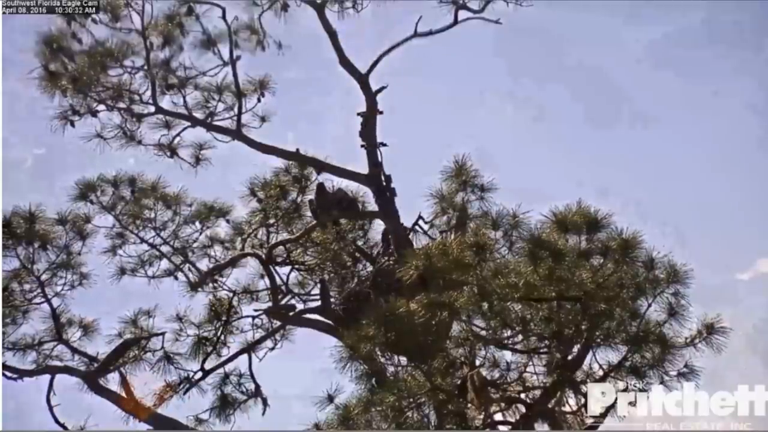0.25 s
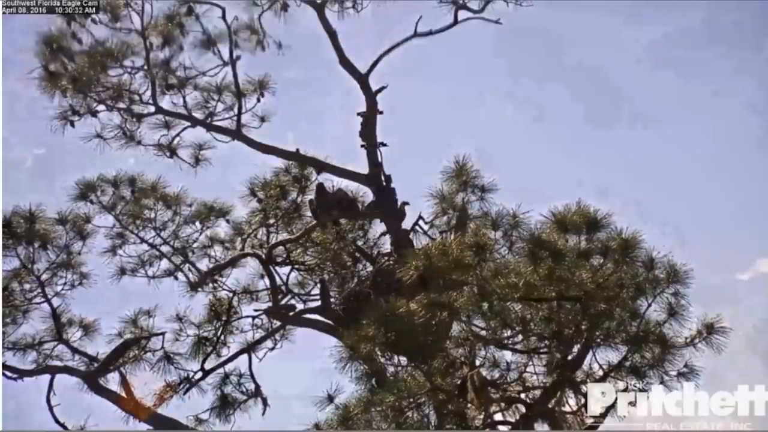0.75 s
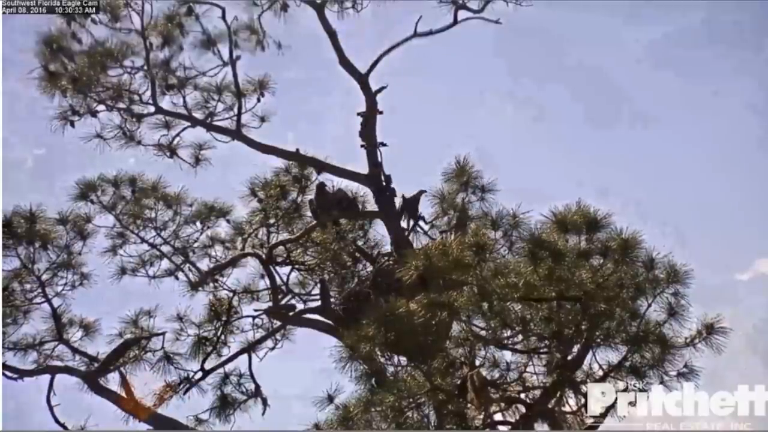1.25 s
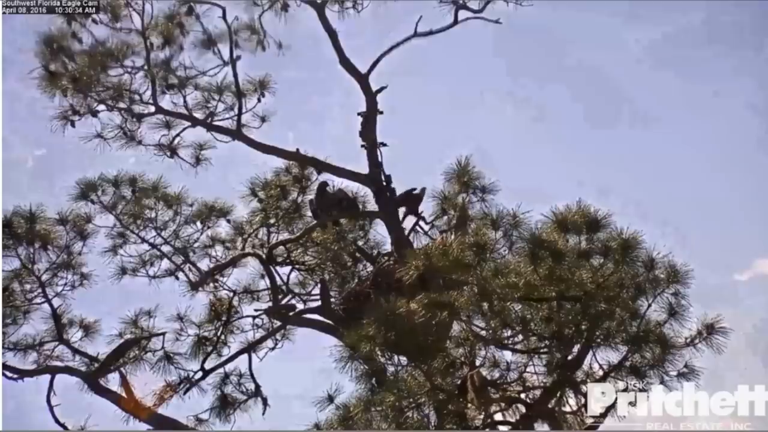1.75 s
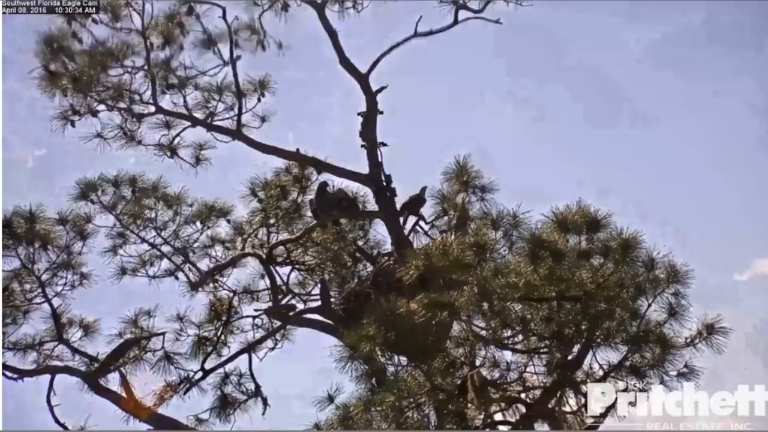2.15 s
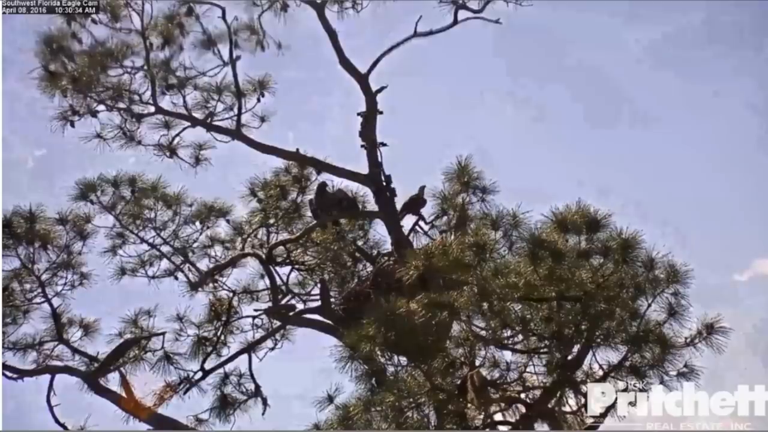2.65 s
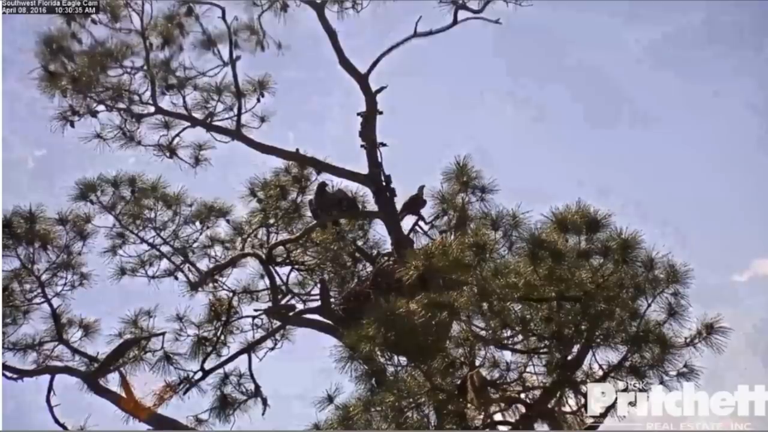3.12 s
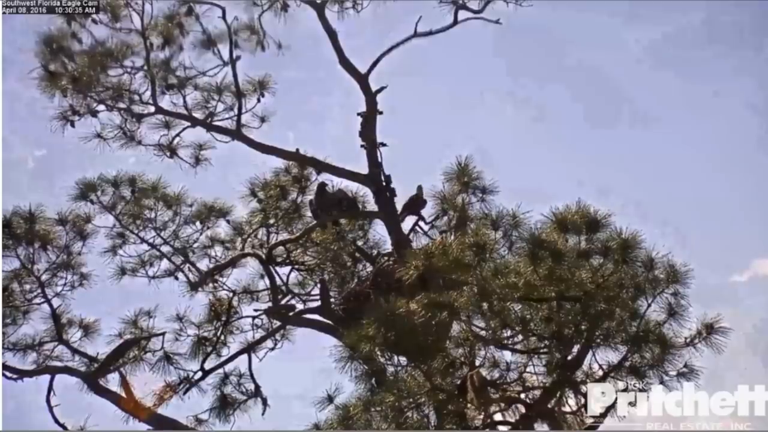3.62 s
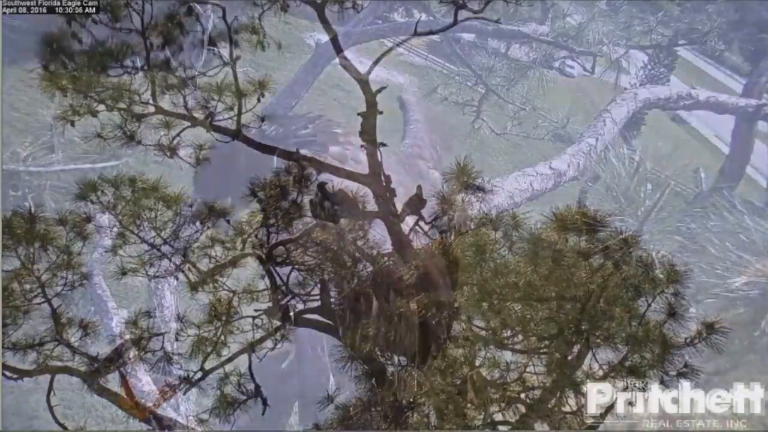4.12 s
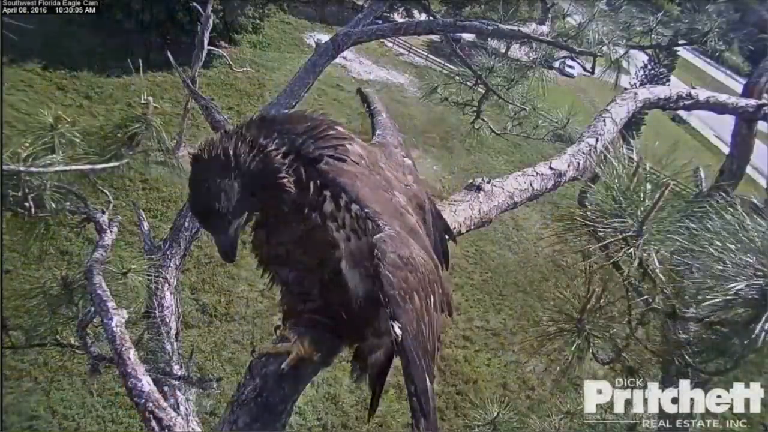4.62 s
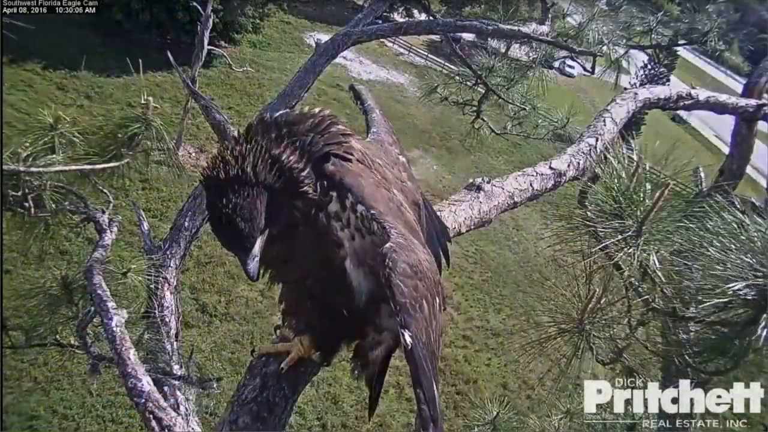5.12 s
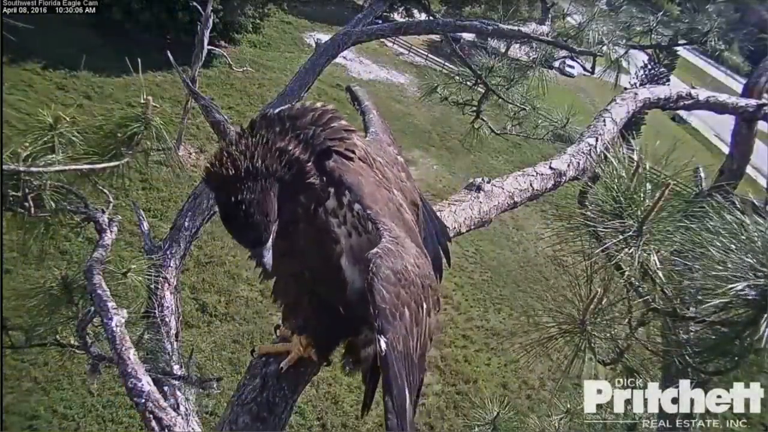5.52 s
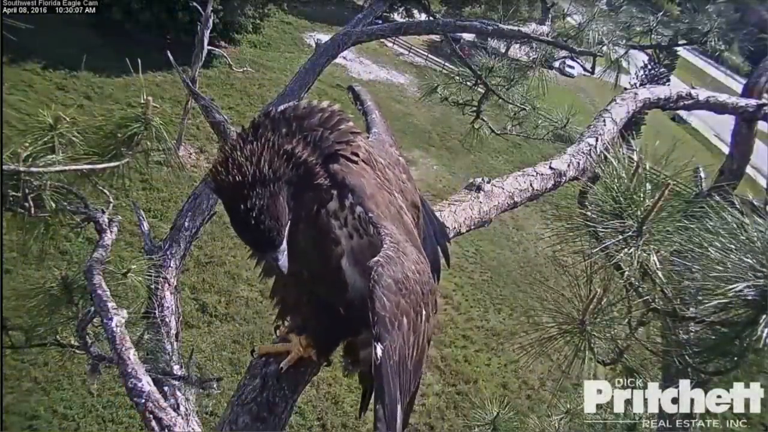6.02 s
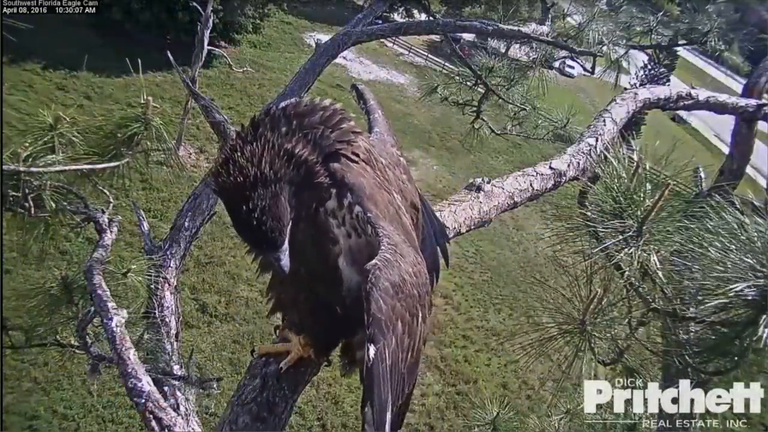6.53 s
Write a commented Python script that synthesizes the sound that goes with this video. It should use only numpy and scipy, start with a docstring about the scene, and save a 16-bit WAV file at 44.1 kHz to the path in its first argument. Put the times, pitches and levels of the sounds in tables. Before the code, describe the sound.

Outdoors, over a soft, even hiss of open air, a young eagle calls again and again in shrill, rising whistles, each up to about a second long. Most drop sharply at the very end. Short pauses separate the early calls; then the voice climbs higher and turns into a strained, rough screech with thin squeaks between. The bird stands out clearly, with almost no echo. The sound drops out briefly twice.

```python
"""Long, high whistles climb, turn hoarse and end in a quick downward flick: a young eagle begs from a pine.
The two sides of its voice box sing at once and beat; nonlinear mixing adds an octave, side tones
and a faint low difference tone. The branches scatter the calls, and a hoarse hiss rides on the later ones.
Steady outdoor hiss lies behind the bird, and twice all sound drops out for an instant."""
import sys
import numpy as np
from scipy import signal
from scipy.fft import rfft, irfft, next_fast_len
from scipy.io import wavfile
from scipy.ndimage import uniform_filter1d, map_coordinates

SR = 44100
rng = np.random.default_rng(int(sys.argv[2]) if len(sys.argv) > 2 else 0)


def generate_wav(sig):
    """Save sig (samples, or channels by samples) to the path in sys.argv[1] as 16-bit PCM at SR."""
    pcm = np.round(np.clip(np.atleast_2d(sig).T, -1, 1) * 32767).astype(np.int16)
    wavfile.write(sys.argv[1], SR, pcm)


N = 298557
TIME = np.arange(N) / SR
STRAIN_HZ = 4790  # near the top of the bird's range

# Colouring of the octave, low difference tone and scratch. Each row: frequency in Hz, gain in dB.
OVERTONE_RESPONSE = [(40, 1), (110, -22.5), (300, -7), (600, 2), (1500, 2.5), (3700, -5.5), (4400, -15),
                     (5600, 2), (6800, 0), (7600, -19.5)]
def eaglet(gain_db=2.5, ceiling_db=-37.5, full_mix_db=-9.5, side_top_hz=4350):
    """Nonlinear mixing: two whistles are heard with their octaves and combination tones."""
    stall, force = stalls(), forcing()
    lead, lead_phasor, lead_leap = whistle(
        leading_notes(), stall, jitter=.0024, hoarse_share=.72, forced_rough=.06,
        flutter_rate=360, sag_hz=65, screech_rate=1200, screech=5.5, tremble_depth=.6)
    second, second_phasor, second_leap = whistle(
        second_notes(), stall, jitter=.006, hoarse_share=.5, forced_rough=.6,
        flutter_rate=500, sag_hz=40, screech_rate=900, screech=2, tremble_depth=.75)
    mirrored = amp(8.5) * force * lead_phasor ** 2 * second.conj()  # at 2 f1 - f2
    stepped = amp(-17.5) * second * second_phasor * lead_phasor.conj()  # at 2 f2 - f1
    # Loud notes and the crests of the beat flatten against the same ceiling.
    limit = (1 + (np.abs(lead + second + mirrored) / amp(ceiling_db)) ** 8) ** (-1 / 8)
    lead, second, mirrored, stepped = limit * np.array([lead, second, mirrored, stepped])
    side_tones = filtered((mirrored + stepped).real, lambda hz: 1 / (1 + (hz / side_top_hz) ** 24))
    both = lead + second
    power = np.abs(both) ** 2
    rms = np.sqrt(np.abs(uniform_filter1d(power, size=441)) + 1e-12)
    difference_tone = amp(-7) * force * (power / rms - rms) * (1 + .49 * wobble(330, N))
    # A leaping tone scratches over a broad band and its octave weakens.
    leaping = np.abs(lead) * lead_leap + np.abs(second) * second_leap
    scratch = amp(-5) * force * leaping * rng.standard_normal(N)
    lead_held, second_held = lead * amp(-2 * lead_leap), second * amp(-2 * second_leap)
    sum_tone = 2 * np.minimum(force / amp(full_mix_db), 1) * lead_held * second_held
    fuzz = .12 * complex_wobble(1100, N)
    octave = force * ((lead_held ** 2 + sum_tone + second_held ** 2) * (1 + fuzz)).real / rms
    overtones = coloured(octave + difference_tone + scratch, OVERTONE_RESPONSE)
    return amp(gain_db) * (both.real + side_tones + sizzle(lead, lead_phasor) + overtones)


def whistle(notes, stall, jitter, hoarse_share, forced_rough, flutter_rate, sag_hz,
            screech_rate, screech, tremble_depth, tremble_hz=34, stall_sag_hz=480.6):
    """Membrane oscillation in one side of the voice box: complex tone, unit phasor and leap (0-1)."""
    tone, phasor, leap = np.zeros(N, complex), np.zeros(N, complex), np.zeros(N)
    force, hoarse = forcing(), hoarse_share * hoarseness()
    for rows in notes:
        times, *columns = np.transpose(rows)
        span = np.arange(max(int(times[0] * SR), 0), min(int(times[-1] * SR), N))
        t, size = span / SR, len(span)
        hz, db = (np.interp(t, times, column) for column in columns)
        leap[span] = np.clip(np.abs(np.gradient(hz)) * SR / 33000, 0, 1) ** 2  # full at 33000 Hz/s
        strain = .056 * (hz / STRAIN_HZ) ** 4
        rough = .0037 + strain + hoarse[span] + forced_rough * force[span] + .072 * leap[span]
        # Even a clear pitch jitters and wanders; a hoarse one also quavers.
        hz *= 1 + jitter * (.4 * wobble(50, size) + wobble(160, size) + .9 * wobble(700, size))
        hz *= 1 + .0012 * wobble(42, size) + .025 * hoarse[span] * wobble(55, size)
        rotation = np.exp(2j * np.pi * np.cumsum(hz - stall_sag_hz * stall[span]) / SR)
        # Hoarseness comes in trembling bursts; forcing evens them out and widens them into a screech.
        wide = screech * force[span]
        tremble = np.sin(2 * np.pi * tremble_hz * t + 1.5 * wobble(25, size))
        rough = np.clip(rough * (1 + tremble_depth * tremble / (1 + 2 * wide ** 2)), 0, .95)
        # Uneven flapping smears part of the tone into a band just under the pitch.
        flutter = complex_wobble(flutter_rate, size) + wide * complex_wobble(screech_rate, size)
        flutter /= np.sqrt(2 + 2 * wide ** 2)
        swing = np.sqrt(1 - rough ** 2) + rough * flutter * np.exp(-2j * np.pi * sag_hz * t)
        swing = unit(swing / (1 + (np.abs(swing) / 1.45) ** 4) ** (1 / 4))  # the swing saturates
        edges = np.clip(np.minimum(t - times[0], times[-1] - t) / .004, 0, 1)
        level = amp(db + 1.5 * hoarse[span] + .2 * wobble(42, size))  # slightly louder when hoarse
        tone[span] += level * edges * (1 - stall[span]) * swing * rotation
        phasor[span] = rotation
    return tone, phasor, uniform_filter1d(leap, size=441)


# The held part of each call, one list a call. Each row: time in seconds, pitch in Hz, relative level in dB.
HELD_PITCHES = [
    [(0.0, 3100, -52.5), (0.062, 3157, -56), (0.091, 3270, -66), (0.096, 3404, -46), (0.166, 3335, -47.5),
     (0.2, 3280, -51), (0.231, 3240, -58), (0.237, 3400, -46.5), (0.282, 3503, -43), (0.348, 3405, -44),
     (0.468, 3397, -43), (0.522, 3415, -48.5), (0.53, 3440, -54.5), (0.538, 3450, -47.5),
     (0.644, 3446, -45), (0.658, 3520, -50), (0.666, 3560, -46.5), (0.69, 3556, -42.5), (0.71, 3580, -49)],
    [(0.752, 2752, -40), (0.798, 2820, -39), (0.866, 2788, -40), (1.076, 2916, -40), (1.168, 3020, -40),
     (1.186, 3304, -40.5), (1.191, 3356, -45.5), (1.206, 3438, -42), (1.21, 3450, -38),
     (1.224, 3448, -40.5), (1.24, 3374, -42), (1.283, 3240, -40.5), (1.292, 2930, -40.5)],
    [(1.864, 2766, -38.5), (1.88, 2840, -39.5), (1.985, 3005, -41.5), (2.008, 3075, -41),
     (2.022, 3067, -41), (2.036, 3223, -41.5), (2.07, 3283, -39), (2.095, 3262, -40.5),
     (2.174, 3304, -41.5), (2.272, 3412, -39.5), (2.296, 3419, -40.5), (2.308, 3360, -42),
     (2.434, 3440, -44), (2.575, 3476, -42.5), (2.592, 3440, -40.5)],
    [(3.15, 2689, -51.5), (3.176, 2824, -53), (3.196, 2802, -45), (3.236, 2872, -41), (3.302, 2832, -50),
     (3.372, 2992, -41.5), (3.52, 3030, -42), (3.606, 3254, -43), (3.698, 3277, -46), (3.73, 3300, -47.5),
     (3.756, 3240, -38), (3.772, 3674, -56.5), (3.882, 3890, -55), (3.91, 3904, -49.5), (4.008, 3976, -48)],
    [(4.155, 4030, -50), (4.19, 4130, -52), (4.246, 4176, -52), (4.288, 4150, -57), (4.338, 4400, -55.5),
     (4.364, 4420, -49), (4.414, 4210, -49.5), (4.44, 4363, -55), (4.448, 4280, -51), (4.51, 4373, -55.5),
     (4.55, 4480, -52.5), (4.604, 4466, -54), (4.688, 4430, -42), (4.738, 4504, -42), (4.79, 4410, -41.5),
     (4.85, 4350, -42), (4.93, 4495, -42), (4.975, 4396, -42), (5.035, 4436, -43), (5.125, 4443, -43),
     (5.158, 4354, -42), (5.18, 4430, -42), (5.27, 4430, -41), (5.282, 4420, -44.5)],
    [(5.8, 3966, -52.5), (5.85, 3843, -46), (5.93, 3960, -52), (5.972, 3965, -40.5), (6.212, 4030, -43.5),
     (6.278, 4010, -41.5), (6.29, 3840, -42.5), (6.304, 4030, -40.5), (6.368, 4150, -46.5),
     (6.382, 4085, -42), (6.434, 4104, -44.5), (6.6, 4100, -44.5), (6.655, 4076, -44.5), (6.703, 3935, -43),
     (6.733, 4210, -47), (6.77, 4060, -42.5)],
]
# The plunge that closes each call but the last.
# Each row: length in seconds, final pitch in Hz, relative level in dB, roughness from 0 to 1.
CLOSING_FLICKS = [(.036, 2120, -47.5, 0.55), (.037, 2380, -44.5, 0.15), (0.035, 2580, -44, 0.25),
                  (0.037, 2550, -46, 1), (.038, 2400, -39.5, 0.45)]
def leading_notes(attack_s=.012, attack_db=3.5):
    """Pitch and level contours of the leading side: attack, held whistle and, but for the last, a flick."""
    endings = [flick(*rows[-1], *plunge[:3]) for rows, plunge in zip(HELD_PITCHES, CLOSING_FLICKS)]
    endings.append(HELD_PITCHES[-1][-1:])
    notes = []
    for rows, ending in zip(HELD_PITCHES, endings):
        start, hz, db = rows[0]
        notes.append([(start - attack_s, hz, db - attack_db), *rows[:-1], *ending])
    return notes


def flick(start, hz, db, length, last_hz, late_db):
    """An accelerating downward glide. Each row: time in seconds, pitch in Hz, relative level in dB."""
    progress = np.linspace(0, 1, 10)
    level = np.interp(progress, [0, 1 / 3, 3 / 4, 1], [db, min(db, late_db) + 2, late_db, late_db - 1])
    return np.transpose([start + progress * length, hz + progress ** 1.25 * (last_hz - hz), level])


# The second side's own notes: a chip, a squeal, a low yelp, a thin squeak and an upward scoop.
# Each row: time in seconds, pitch in Hz, relative level in dB.
OWN_NOTES = [
    [(1.84, 3116, -50), (1.86, 2940, -58)],
    [(4.02, 4250, -56), (4.086, 4830, -71), (4.15, 4650, -62)],
    [(4.522, 2720, -51), (4.54, 3620, -47), (4.555, 3360, -48.5), (4.58, 3360, -48.5), (4.609, 3370, -40.5),
     (4.625, 3610, -47), (4.655, 3730, -42), (4.662, 3855, -51)],
    [(5.36, 3820, -57), (5.385, 3637, -49.5), (5.41, 4310, -63), (5.425, 4170, -59), (5.445, 4420, -60.5),
     (5.475, 4330, -64), (5.49, 4870, -63.5), (5.57, 4950, -70), (5.65, 5270, -77.5), (5.76, 5030, -63),
     (5.83, 4820, -65)],
    [(5.756, 2510, -57), (5.767, 2620, -43), (5.78, 3024, -40.5), (5.8, 3370, -40.5), (5.84, 3346, -47.5),
     (5.868, 3312, -39), (5.89, 3380, -46.5), (5.968, 3640, -47.5)],
]
# The second side sings just above or below the leading pitch.
# Each row: start and end in seconds, first and last pitch gap in Hz, relative level in dB.
SHADOW_NOTES = [(0, 0.102, 379.5, 380, -59.5), (0.205, 0.23, 249, 480.5, -60),
                (1.232, 1.259, 602.5, 706, -54), (2.032, 2.082, 581.5, 558, -57.5),
                (2.085, 2.194, 631.5, 650, -53), (2.188, 2.212, 399.5, 598, -57.5),
                (2.237, 2.254, 593, 563, -60), (2.298, 2.381, 647.5, 567, -52),
                (2.369, 2.579, 574.5, 554.5, -52), (3.18, 3.564, 399, 367, -55.5),
                (3.56, 3.747, 317.5, 234.5, -54), (3.77, 4.158, -320, -380, -57.5),
                (4.665, 4.768, -240, -270, -54), (6.178, 6.422, 562.5, 561, -74),
                (6.441, 6.613, 745, 1197, -66.5), (6.643, 6.72, 621, 621, -60)]
# The second side plunges alone in mid-call. Each row: start in seconds, relative level in dB.
VOICE_CRACKS = [(4.245, -52), (5.008, -49)]
def second_notes():
    """Biphonation: the second side sings its own notes, shadows the leading pitch or cracks away."""
    times, lead_hz, _ = np.concatenate(HELD_PITCHES).T
    notes = list(OWN_NOTES)
    arch_db = 3 * np.linspace(-1, 1, 20) ** 4  # weaker as it enters and leaves
    for start, end, first_gap, last_gap, db in SHADOW_NOTES:
        t = np.linspace(start, end, 20)
        hz = np.interp(t, times, lead_hz) + np.linspace(first_gap, last_gap, 20)
        notes.append(np.transpose([t, hz, db - arch_db]))
    for start, db in VOICE_CRACKS:
        hz = np.interp(start, times, lead_hz)
        notes.append(flick(start, hz, db - 1, length=.028, last_hz=2640, late_db=db))
    return notes


# How hard the voice is forced. Each row: time in seconds, overtone drive in dB.
VOCAL_FORCE = [(0, -33), (.72, -31.5), (.75, -14.5), (1.32, -10.5), (1.842, -26), (1.862, -13.5),
               (2.62, -10), (3.15, -33), (3.24, -26.5), (3.32, -36), (3.39, -21), (3.52, -18.5),
               (3.65, -27.5), (3.76, -22.5), (3.85, -28), (4.48, -37), (4.58, -23.5), (4.75, -23),
               (5.005, -24), (5.025, -13.5), (5.045, -24.5), (5.25, -23.5), (5.3, -12.5), (5.36, -34.5),
               (5.77, -29.5), (5.81, -10.5), (6.0, -32.5)]
def forcing():
    """Nonlinear drive as a gain: the harder the voice is forced, the stronger the overtones."""
    return amp(curve(VOCAL_FORCE))


# Spells of hoarseness. Each row: start and end in seconds, roughness from 0 to 1.
HOARSE_SPELLS = [(.19, .23, 0.55), (1.185, 1.27, 0.13), (2.03, 2.24, 0.08), (2.33, 2.38, 0.33),
                 (2.38, 2.588, 0.62), (3.14, 3.19, 0.66), (3.6, 3.88, 0.29), (4.02, 4.32, 0.9),
                 (4.32, 4.48, 0.44), (4.76, 5.28, 0.01), (5.012, 5.04, 0.22), (5.4, 5.755, 0.57),
                 (5.755, 5.8, 0.31), (5.8, 5.96, .24), (6.025, 6.13, 0.55), (6.13, 6.2, .3),
                 (6.2, 6.33, 0.6), (6.33, 6.45, 0.34), (6.45, 6.688, 0.6)]
def hoarseness():
    """Aperiodic vibration (0-1): the voice roughens in the hoarse spells and at every closing flick."""
    flicks = [(rows[-1][0], rows[-1][0] + length, rough)
              for rows, (length, _, _, rough) in zip(HELD_PITCHES, CLOSING_FLICKS)]
    return np.clip(spells(HOARSE_SPELLS + flicks, ramp_s=.03), 0, 1)


def stalls(half_width_s=.0011):
    """Intermittent oscillation: how far brief, uneven catches choke the hoarse voice (0-1)."""
    catches_per_s = 46 + 250 * forcing()
    gaps, sizes = rng.uniform([.25, .5], [1.75, 1.5], (1500, 2)).T
    onsets = np.searchsorted(np.cumsum(catches_per_s) / SR, np.cumsum(gaps))
    pulse = np.exp(-(np.arange(-441, 442) / SR / half_width_s) ** 2)
    catches = signal.fftconvolve(np.bincount(onsets, sizes, N + 1)[:N], pulse, "same")
    return np.clip(1.05 * hoarseness() * catches, 0, .95)


# The noisy top of a strained note. Each row: frequency in Hz, relative spectral density in dB.
SIZZLE_SPECTRUM = [(5700, -39), (6600, 11.5), (7300, 0), (7800, -20)]
def sizzle(tone, phasor):
    """Amplitude-modulated noise: a sizzle follows the tone's level and grows steeply with its pitch."""
    phase_step = np.angle(uniform_filter1d(phasor * np.roll(phasor, 1).conj(), size=400))
    pitch_hz = phase_step * SR / (2 * np.pi)
    strain = np.clip(pitch_hz / STRAIN_HZ, 0, 1) ** 6
    return amp(-31) * np.abs(tone) * strain * noise(SIZZLE_SPECTRUM) * amp(2.5 * wobble(30, N))


# The hoarse hiss and the airy hiss. Each row: frequency in Hz, relative spectral density in dB.
RASP_SPECTRUM = [(300, -29), (900, -9), (1600, 0.5), (2300, 6.5), (2850, 13.5), (3500, 5), (4800, -8.5),
                 (5600, -47), (7700, -41.5)]
AIRY_SPECTRUM = [(3700, -20), (4250, 7), (4700, -1.5), (5100, 0), (5600, -24), (6500, -50)]
# The course of the hoarse hiss. Each row: time in seconds, level in dB.
RASP_ENVELOPE = [(3.3, -100), (3.9, -68.5), (4.4, -62.5), (4.85, -55), (5.3, -57), (5.36, -62),
                 (5.74, -61.5), (5.8, -63.5), (6.77, -61)]
# Spells of airy hiss. Each row: start and end in seconds, level in dB.
AIRY_SPELLS = [(0.752, 1.37, -73), (3.151, 3.3, -82), (4.817, 5.348, -59.5), (5.422, 5.76, -96)]
def rasp():
    """Band noise: a hoarse hiss rides on the later calls, and an airy 4-5 kHz hiss comes in spells."""
    airy = noise_spells(AIRY_SPELLS, AIRY_SPECTRUM)
    hiss = amp(curve(RASP_ENVELOPE) + .72 * wobble(25, N)) * noise(RASP_SPECTRUM)
    return hiss + airy * amp(2.6 * wobble(60, N))


def thump(at_s=5.312, half_width_s=.012, level_db=-63, top_hz=284):
    """A transient of low-pass noise: a soft thump as the longest call snaps shut."""
    swell = np.exp(-((TIME - at_s) / half_width_s) ** 2)
    return amp(level_db) * swell * noise([(top_hz, 0), (2 * top_hz, -30)])


def branches(x, level_db=-16, t60_s=.17):
    """Scattering: the branches around the nest return a faint, exponentially decaying tail."""
    t = np.arange(SR // 4) / SR
    tail = rng.standard_normal(len(t)) * amp(-60 * t / t60_s)
    return amp(level_db) * signal.fftconvolve(x, tail / np.linalg.norm(tail))[:N]


# The outdoor hiss and its added treble. Each row: frequency in Hz, relative spectral density in dB.
OUTDOOR_SPECTRUM = [(25, -14.5), (100, -17), (240, -10), (620, -5.5), (1090, -3), (1420, 3.5), (2000, -1.5),
                    (2850, 3.5), (3600, -6), (4500, -39.5), (6000, -44.5), (7800, -58)]
TREBLE_SPECTRUM = [(2800, -10.5), (3800, 9), (4700, -3), (5400, -8.5), (6300, -19), (7500, -34)]
# The course of the outdoor hiss. Each row: time in seconds, level in dB.
OUTDOOR_ENVELOPE = [(0, -58.5), (.7, -60.5), (.8, -64), (1.8, -59.5), (2.65, -67.5), (2.72, -59),
                    (4.2, -63), (6.77, -63)]
# Brighter hiss in two pauses between calls. Each row: start and end in seconds, level in dB.
TREBLE_SPELLS = [(1.339, 1.83, -76.5), (2.701, 3.116, -76)]
def outdoors(hum_hz=133, hum_db=-90):
    """Ambient noise: the broadband hiss of open air wavers slightly over a faint hum."""
    hum = amp(hum_db) * np.sin(2 * np.pi * hum_hz * TIME + wobble(38, N))
    treble = noise_spells(TREBLE_SPELLS, TREBLE_SPECTRUM)
    hiss = amp(curve(OUTDOOR_ENVELOPE) + wobble(14, N)) * noise(OUTDOOR_SPECTRUM)
    return hiss + treble + hum


def amp(db):
    """Decibels to gain."""
    return 10 ** (np.asarray(db) / 20)


def unit(x):
    """Normalisation to rms 1."""
    return x / np.sqrt(np.mean(np.abs(x) ** 2) + 1e-20)


def curve(rows):
    """Linear interpolation of (seconds, value) rows at every sample."""
    return np.interp(TIME, *np.transpose(rows))


def spells(rows, ramp_s):
    """A sum of trapezoidal envelopes. Each row: start and end in seconds, height."""
    return sum(height * np.clip(.5 + np.minimum(TIME - start, end - TIME) / ramp_s, 0, 1)
               for start, end, height in rows)


def wobble(rate, size):
    """Smooth random modulation with rate knots a second."""
    knots = rng.standard_normal(int(size * rate / SR) + 4)
    return map_coordinates(knots, [np.arange(size) * rate / SR])


def complex_wobble(rate, size):
    """Random modulation of both amplitude and phase."""
    return wobble(rate, size) + 1j * wobble(rate, size)


def filtered(x, response):
    """Linear filtering: the spectrum of x times a frequency response."""
    size = next_fast_len(N + SR // 2)
    return irfft(rfft(x, size) * response(np.fft.rfftfreq(size, 1 / SR)), size)[:N]


def coloured(x, spectrum):
    """Spectral shaping by (Hz, dB) points on a logarithmic frequency axis."""
    points_hz, db = np.transpose(spectrum)
    return filtered(x, lambda hz: amp(np.interp(np.log(hz + 1), np.log(points_hz), db)))


def noise(spectrum):
    """Coloured noise of rms 1."""
    return unit(coloured(rng.standard_normal(N), spectrum))


def noise_spells(rows, spectrum):
    """Gated noise with gradual edges. Each row: start and end in seconds, level in dB."""
    return spells([(start, end, amp(db)) for start, end, db in rows], ramp_s=.042) * noise(spectrum)


def scene():
    """Superposition of the bird, its scattered sound and the open air, in mono."""
    bird = eaglet()
    return (bird + branches(bird) + rasp() + thump() + outdoors())[None]


# Brief silences. Each row: start and end in seconds.
SILENCES = [(3.1, 3.143), (6.605, 6.648)]
def record(dry, fade_in_s=.012, top_hz=7800):
    """Gating and band limiting: the sound cuts out twice and fades back in, under a steep low-pass."""
    gate = np.ones(N)
    for start, end in SILENCES:
        gate *= np.where(TIME < start, 1, np.clip((TIME - end) / fade_in_s, 0, 1))
    return filtered(dry[0] * gate, lambda hz: 1 / (1 + (hz / top_hz) ** 80))[None]


dry = scene()
out = record(dry)
generate_wav(out)
```